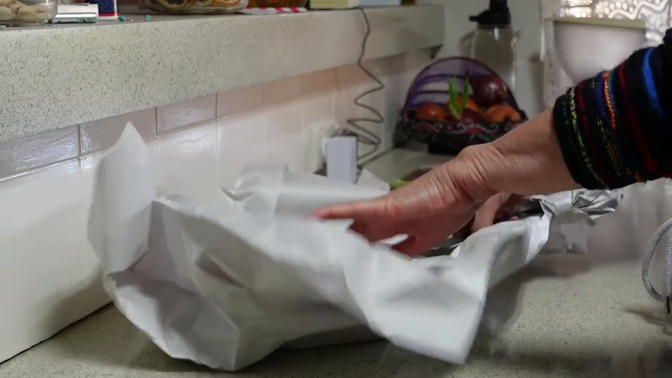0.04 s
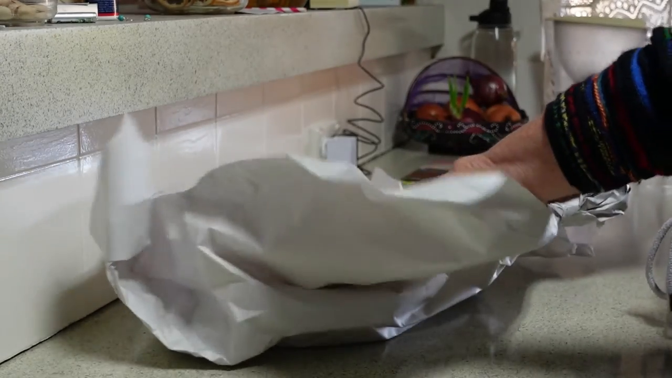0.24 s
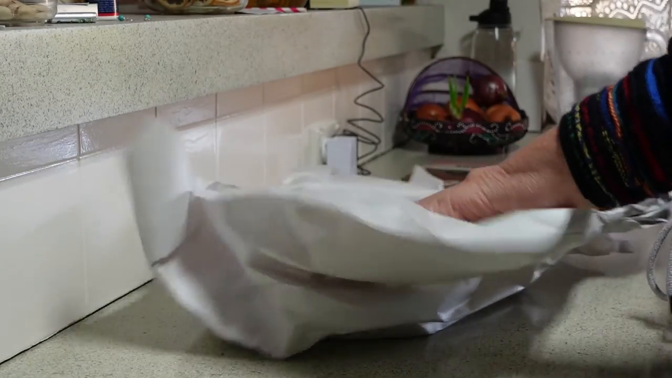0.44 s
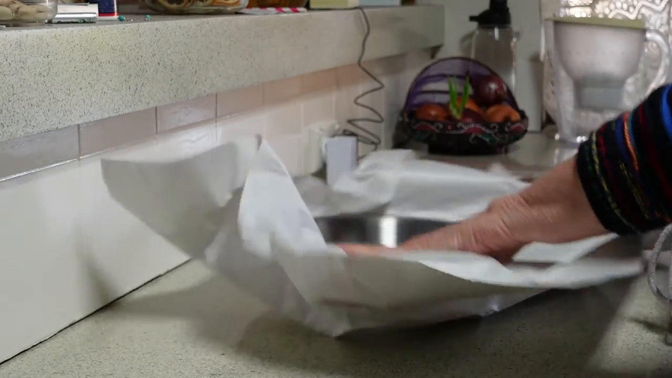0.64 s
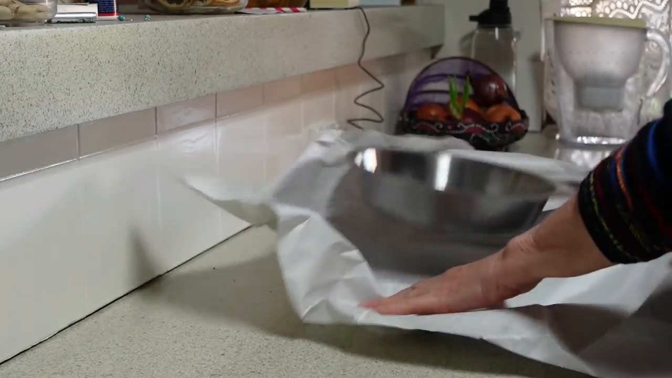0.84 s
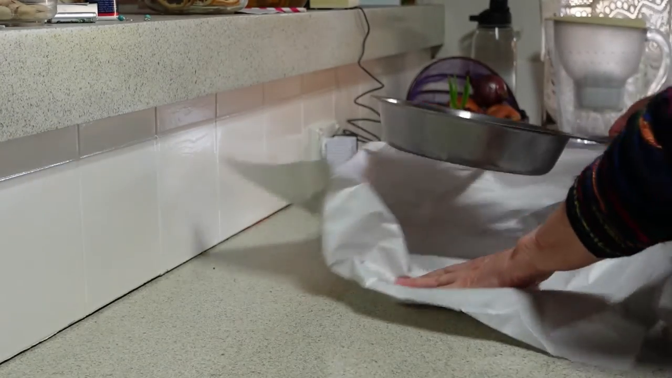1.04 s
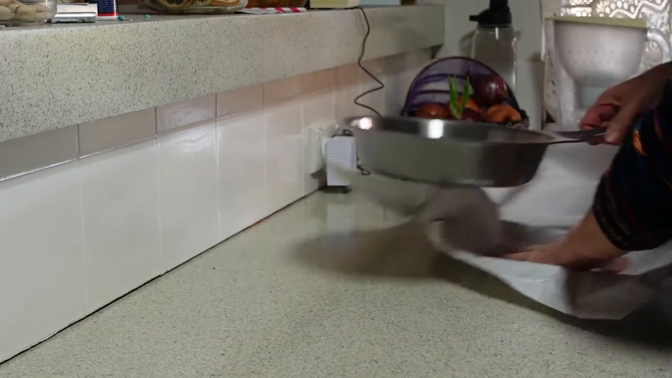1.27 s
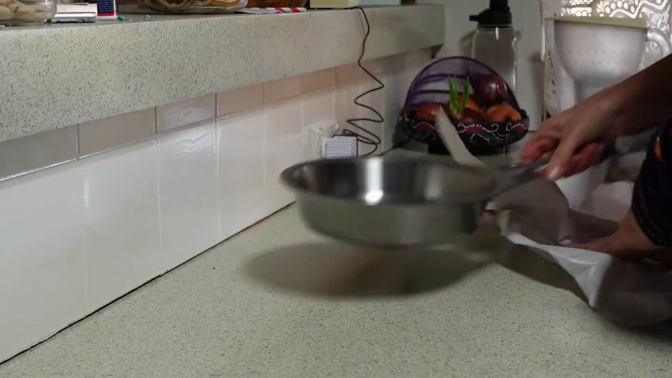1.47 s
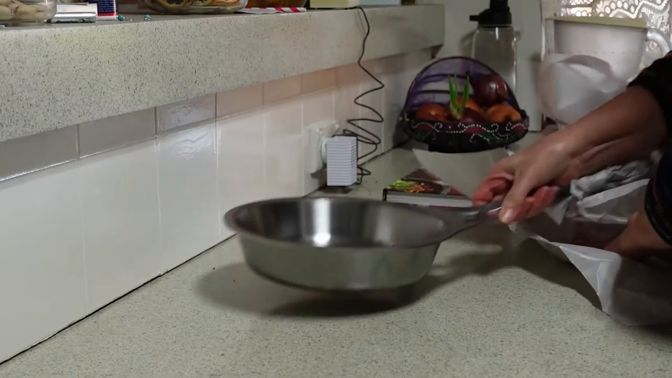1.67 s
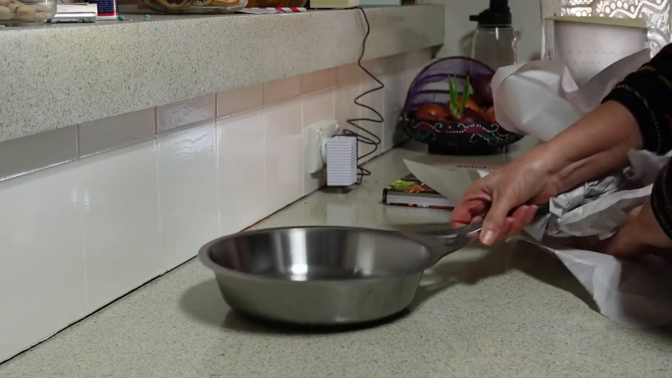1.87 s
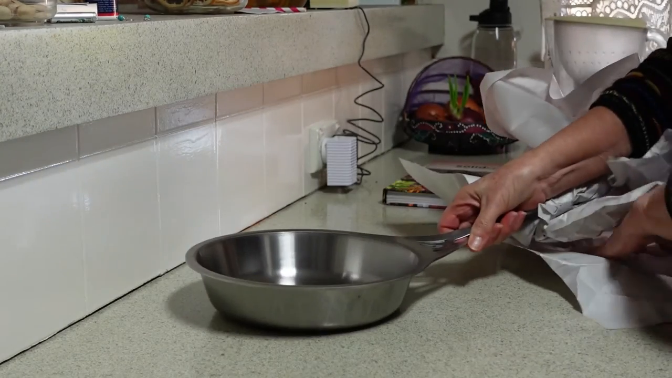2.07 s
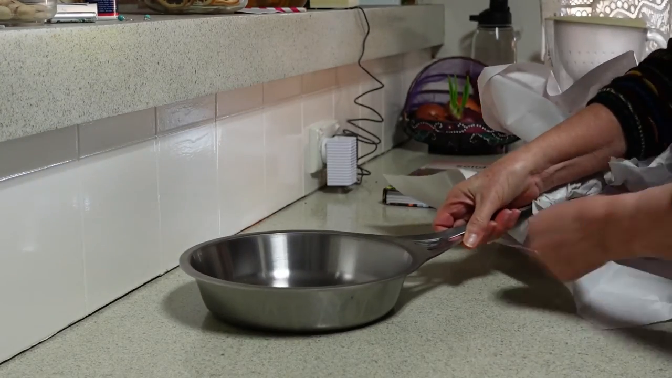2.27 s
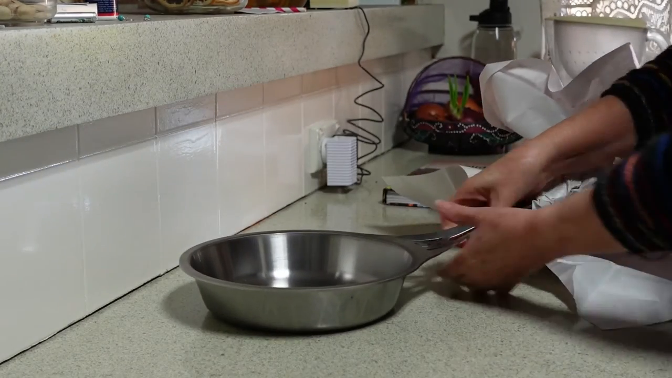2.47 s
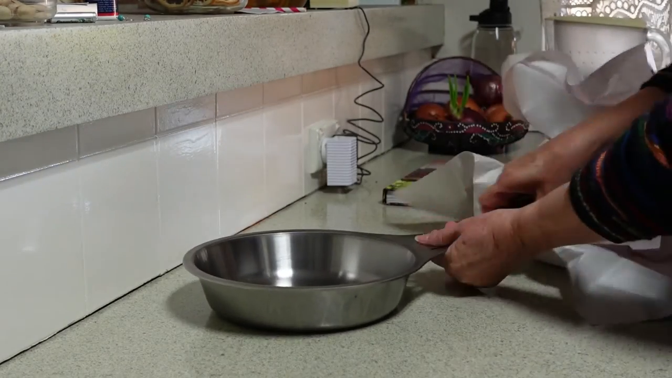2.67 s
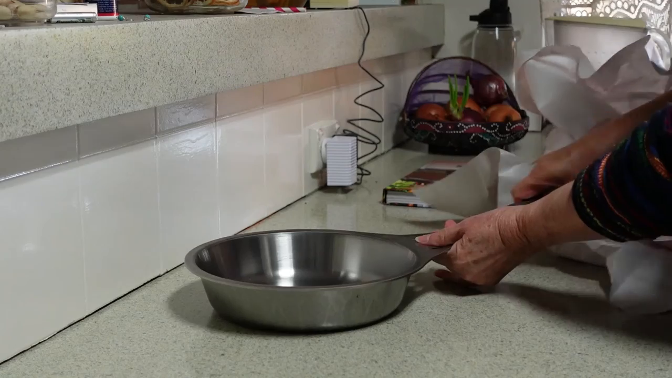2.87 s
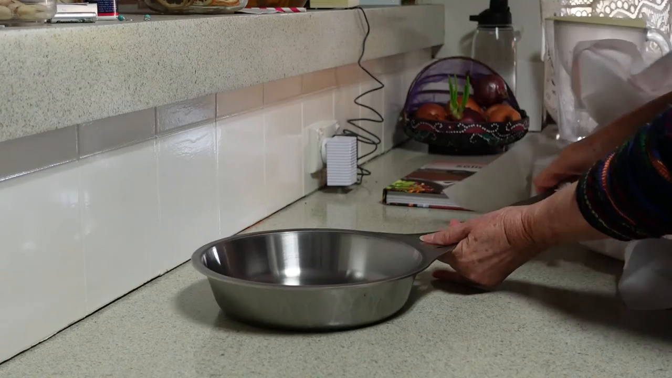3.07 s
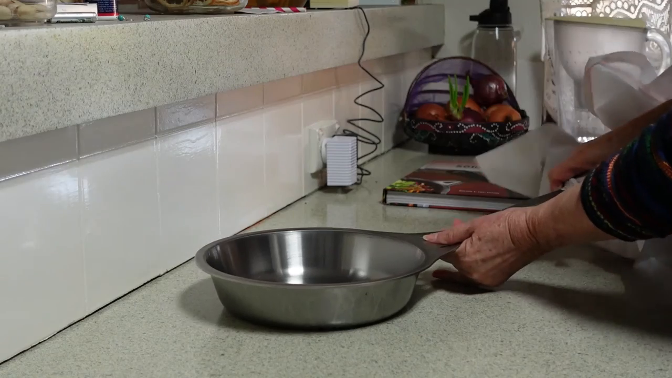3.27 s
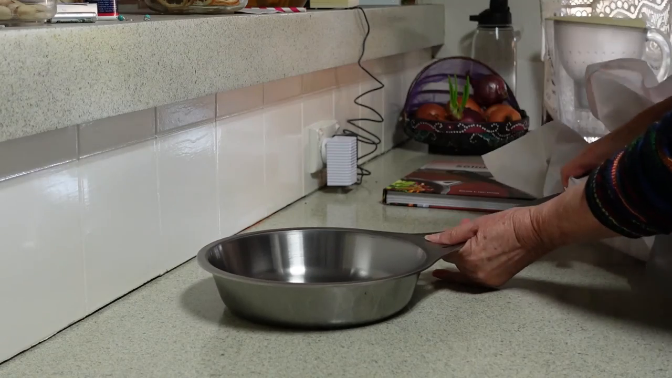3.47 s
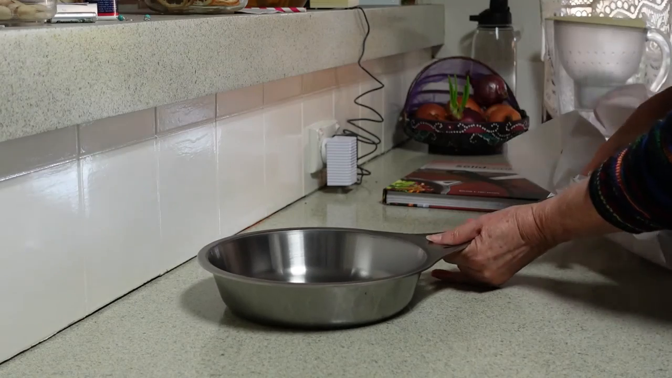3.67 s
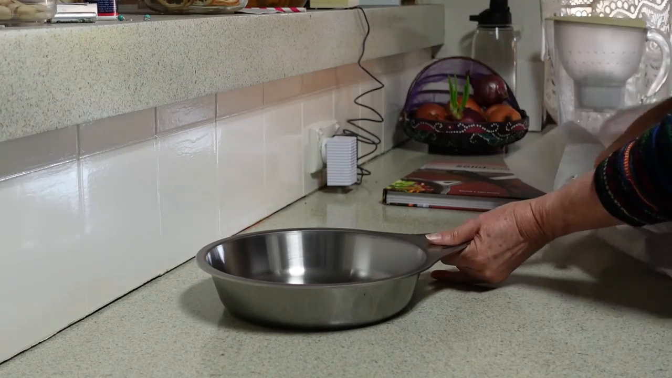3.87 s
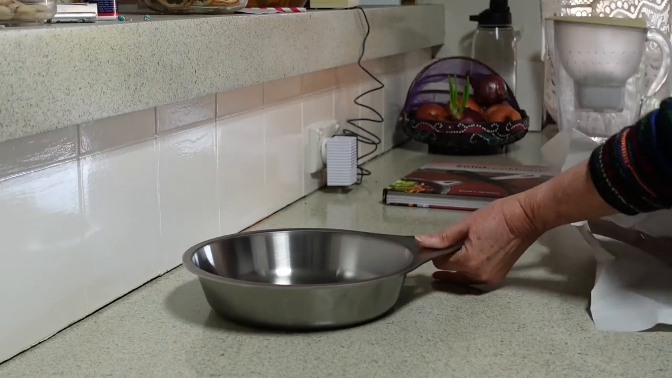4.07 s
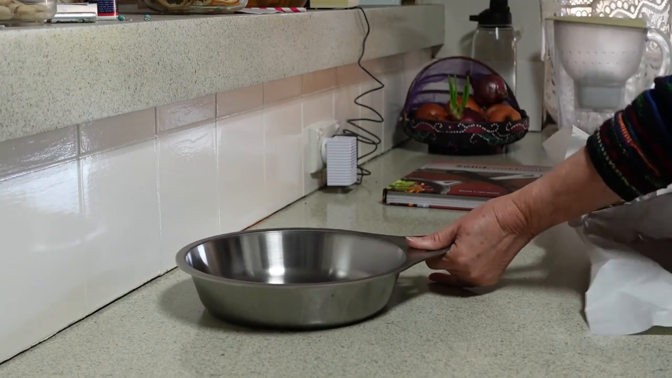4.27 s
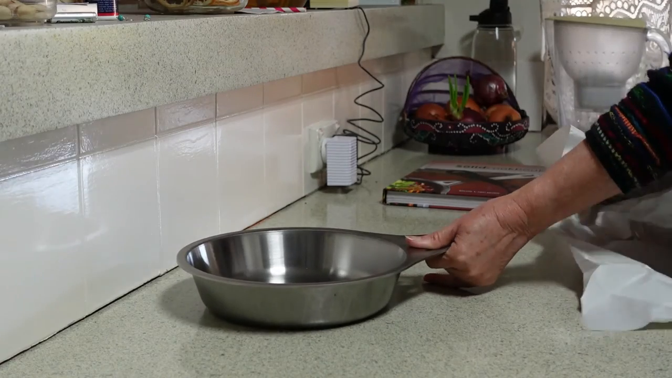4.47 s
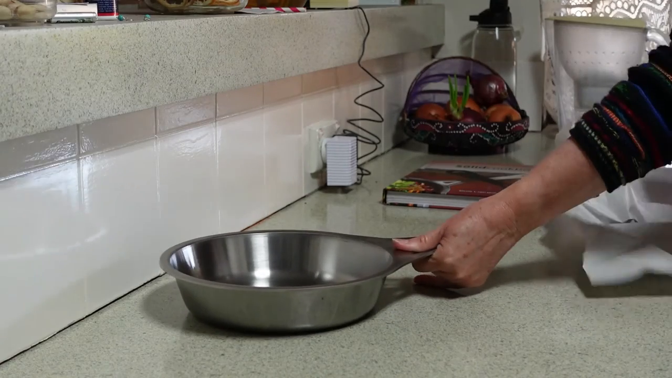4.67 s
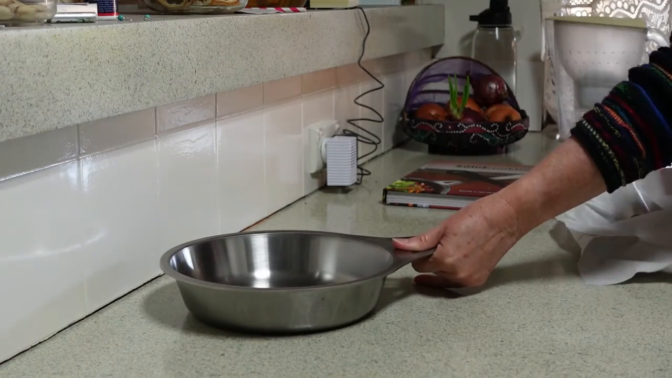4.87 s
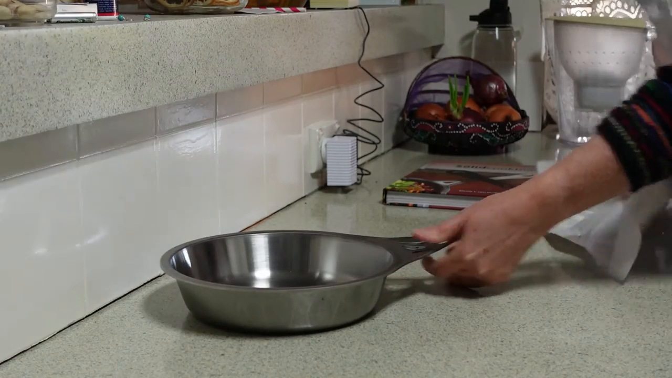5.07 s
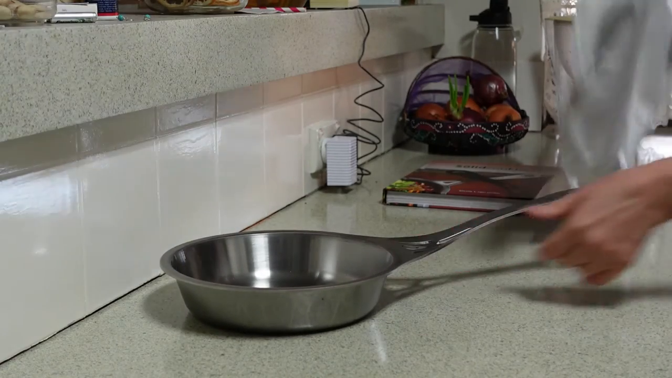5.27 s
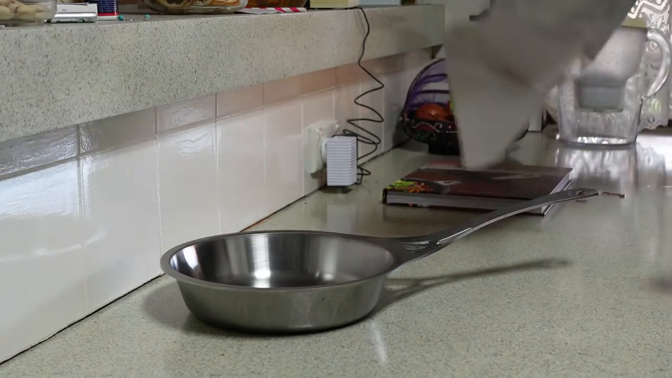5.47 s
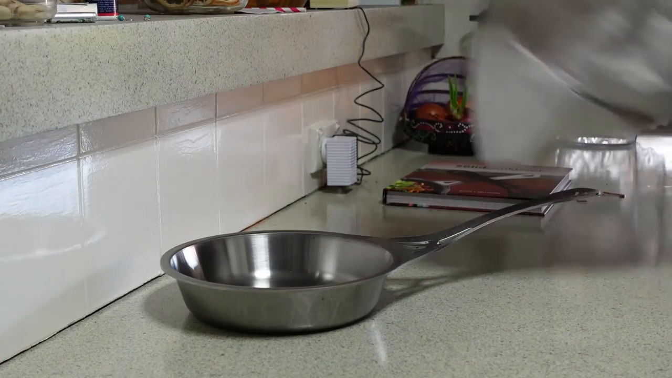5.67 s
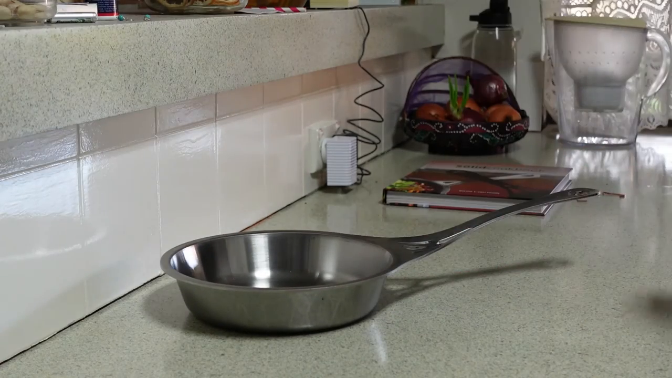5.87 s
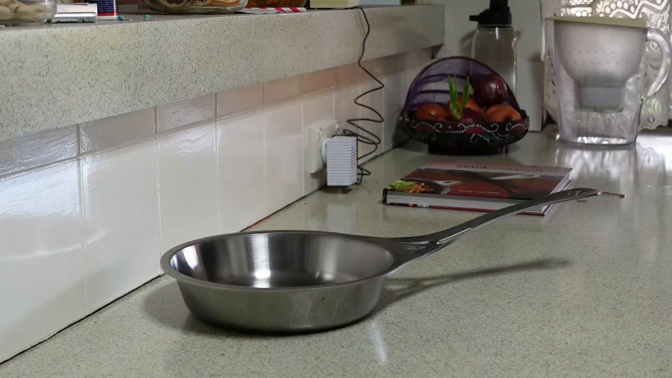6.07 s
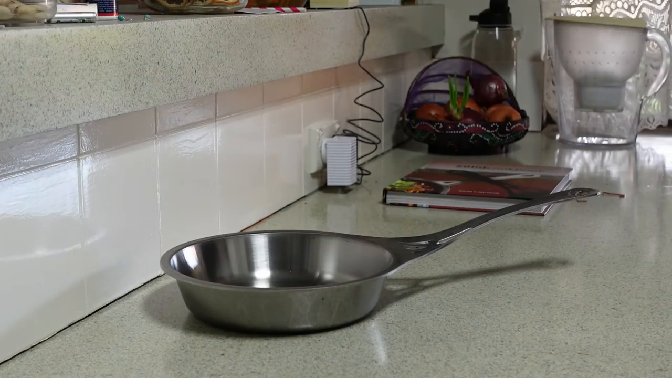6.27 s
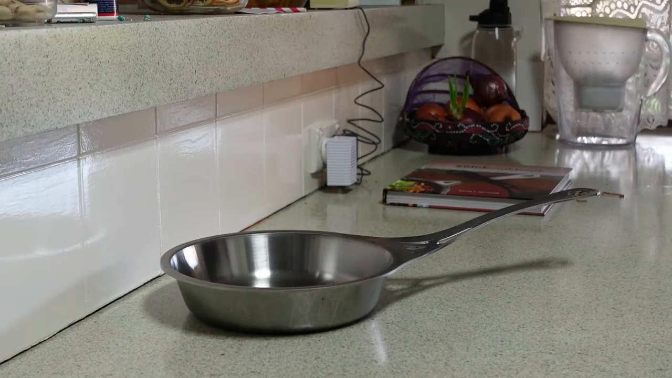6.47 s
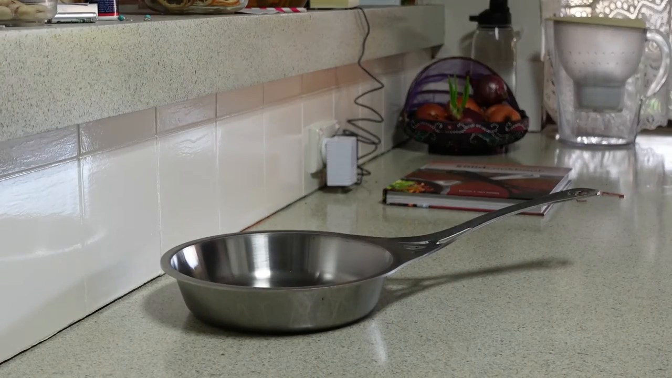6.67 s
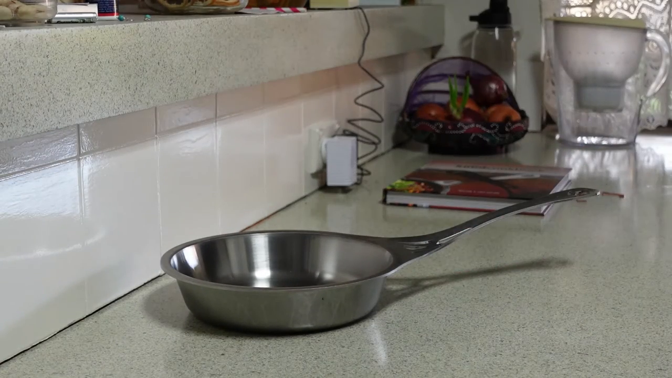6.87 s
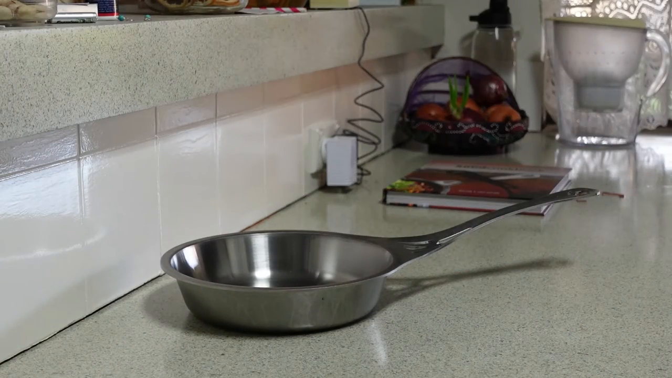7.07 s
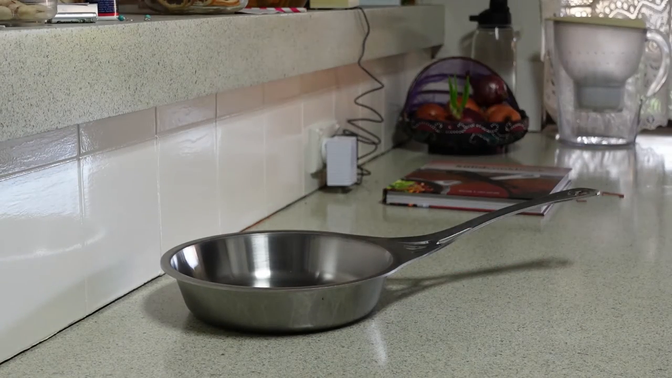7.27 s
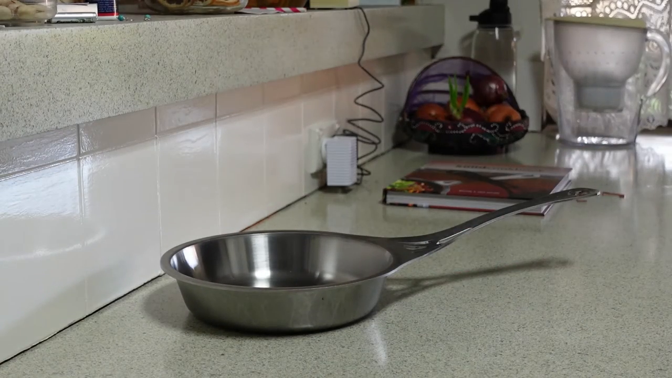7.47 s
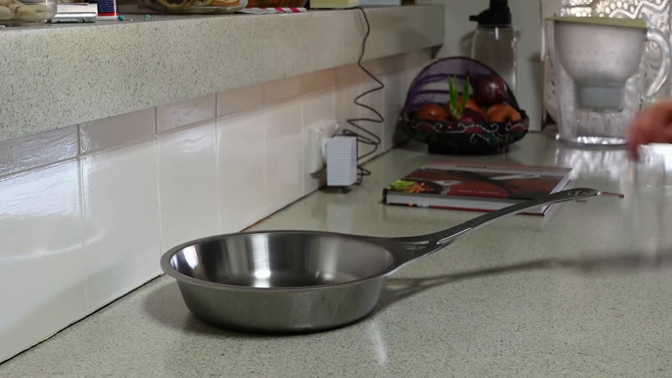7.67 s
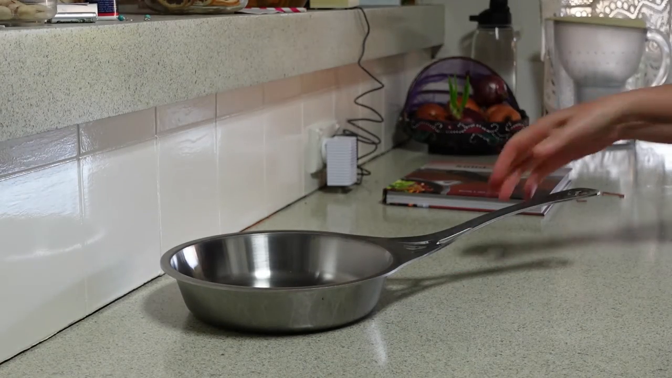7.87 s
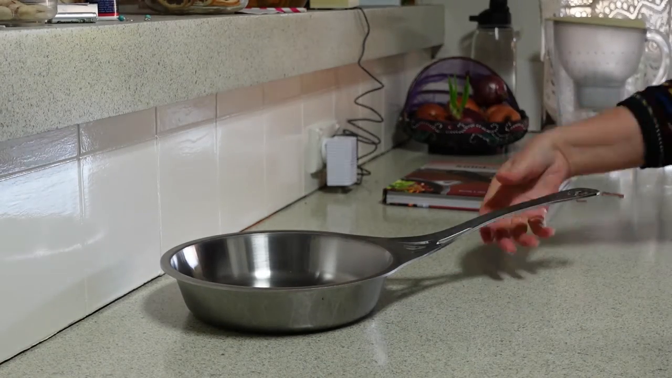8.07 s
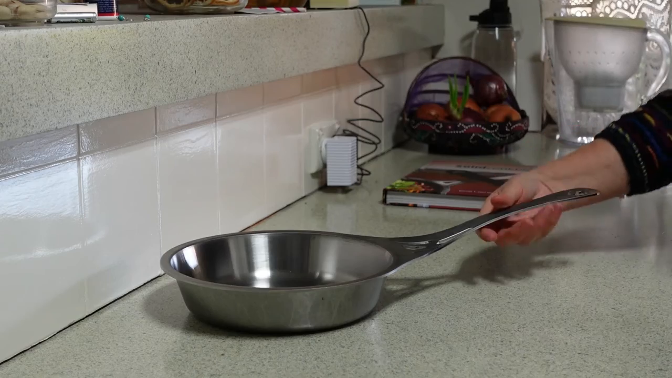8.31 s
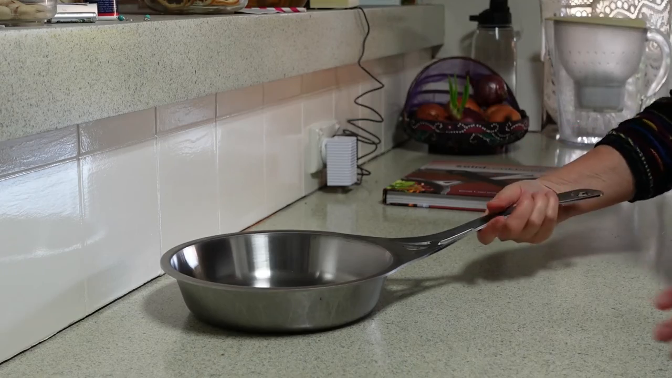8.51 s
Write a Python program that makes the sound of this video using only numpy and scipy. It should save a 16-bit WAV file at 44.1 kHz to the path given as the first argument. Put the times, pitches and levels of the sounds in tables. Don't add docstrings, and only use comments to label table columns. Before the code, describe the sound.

A small reflective kitchen heard from close by, with a faint steady appliance hum. From the start, thick stiff paper crackles in clumped bursts, with crisp snaps growing dense and loud around 0.6 to 0.75 seconds, and again from 1.1 to 1.5 as a pan is lifted out. Soft hand bumps sit underneath. At about 2.0 the pan meets the counter: a light tick, a dull short knock, a small bounce at 2.1 and faint rocking. From 2.2 to 4.2 the paper rustles more quietly in uneven drags and tugs, with a stronger pull near 4.6. After a sparser stretch, it is balled up in a loud, continuous crunch from 5.8 to 6.7, then fades with more room echo. At 7.56 the bundle lands out of sight with a soft, papery slap. Only slight settling, faint ticks and hum remain until 8.5.

```python
import sys
import numpy as np
from scipy import signal
from scipy.fft import rfft, irfft, next_fast_len
from scipy.io import wavfile
from scipy.ndimage import uniform_filter1d

SR = 44100
rng = np.random.default_rng(int(sys.argv[2]) if len(sys.argv) > 2 else 0)


def convert_level_to_amplitude(level_db):
    exponent = np.asarray(level_db, float) / 20
    return 10 ** exponent


def to_wav(s):
    ch = np.atleast_2d(s).T
    pcm = np.round(np.clip(ch, -1, 1) * 32767)
    wavfile.write(sys.argv[1], SR, pcm.astype(np.int16))


N = 376613

# (time [s], left over right [dB], share of the kitchen [dB])
PAPER_PLACE = [
    (0, -0.3, -9),
    (2, -0.5, -4.5),
    (4, -0.8, -5),
    (5.4, -0.4, -3.5),
    (6, -1.6, -2),
    (7, -3, -1.5),
    (8.54, -3.5, -0.5),
]
# (start [s], hold [s], effort [dB], fine fizz [dB])
TUGS = [(-.01, 0.0099, -22.5, 14), (0.108, 0.044, -28.5, -7), (0.25, 0.0088, -25, -7),
        (0.366, 0.0086, -30.5, 2), (0.594, 0.14, -25, -1), (0.918, 0.1, -33.5, 17),
        (1.127, 0.087, -24.5, 0), (1.204, 0.069, -23.5, -1), (1.419, 0.043, -27, -1),
        (1.753, 0.02, -26, -2), (2.385, 0.004, -43, -19), (3.43, 0.017, -40, 11), (3.608, 0.12, -29.5, 5.5),
        (3.795, 0.012, -34, -6), (3.94, 0.1, -29.5, 4), (4.182, 0.016, -35.5, 0),
        (4.324, 0.056, -33.5, -63), (4.583, 0.093, -23, -7), (4.998, 0.0055, -38, -15),
        (5.057, 0.02, -31.5, 3), (5.235, 0.041, -31.5, 1), (5.34, 0.082, -33.5, 5),
        (5.544, 0.017, -31.5, -20), (5.584, .01, -29, -16), (5.773, 0.025, -32, -3),
        (5.792, 0.06, -22.5, -1), (6.559, 0.12, -23, 0.5), (6.956, .004, -38, -12),
        (7.483, .004, -37.5, -1), (8.199, 0.039, -41, -6), (8.383, 0.038, -43.5, -23),
        (8.489, 0.057, -39, -6)]
# (start [s], length [s], effort [dB],
# sheet boom [dB], fine fizz [dB])
DRAGS = [(0.035, 0.1, -30, 1.5, -11), (0.135, 0.12, -39, -5, 11), (0.278, 0.058, -39, 12, 34),
         (0.417, 0.18, -33, -4.5, 7), (0.47, 0.048, -28, 4, 5), (0.728, 0.52, -29, -6.5, -4),
         (1.235, 0.21, -26, -2.5, 4), (1.457, 0.24, -25, -0.5, -1.5), (1.75, 0.31, -34, -3, -3),
         (2.008, 0.18, -38.5, 6, 19), (2.214, 0.062, -33.5, -4, 17), (2.3, 0.064, -40, -4, 1),
         (2.38, 0.3, -46.5, -3, 12), (2.59, 0.19, -33.5, -6, 3.5), (2.804, 0.09, -32.5, -7, 1),
         (2.94, 0.39, -33, -3.5, 1.5), (3.172, 0.14, -35.5, 7.5, 3), (3.451, 0.12, -32, -0.5, 9.5),
         (3.823, 0.13, -29, 2, 2), (4.085, 0.235, -38, 1.5, -4), (4.332, 0.29, -29, 0.5, 9),
         (4.72, 0.11, -39.5, 8, 12), (4.86, 0.17, -50.5, 1, 8), (5.102, 0.27, -35, -6.5, 3),
              (5.62, 0.15, -41, 1, 1), (5.893, 0.08, -19.5, -5.5, 2), (6.002, 0.16, -24.5, -3, 5),
              (6.198, 0.14, -24, -1, 3.5), (6.392, 0.29, -24.5, -4.5, -7), (6.638, 0.19, -29, -11, -10),
              (7.022, 0.18, -34, -15, -15), (7.149, 0.057, -30.5, -13, 5), (7.26, 0.14, -38.5, -12, -6),
              (7.698, 0.26, -37, -11.5, 6), (8.0, 0.16, -44, -18, 16)]
# (frequency [Hz], level [dB per Hz])
PAPER_COLOUR = [(35, -59), (60, -37), (176, -7.5), (268, -5.5), (400, -7), (800, -3.5), (1280, -4.5),
                (2140, -3), (7750, -10.5), (14900, -20)]
# (time [s], peak
# [dB], pitch [Hz], sharp edge over the peak [dB])
CREASE_SNAPS = [(0.0312, -16, 1890, -9), (0.049, -18, 2390, -9), (0.0638, -14, 4650, -7),
                (0.0696, -19, 2090, -10), (0.0952, -19, 1740, -14), (0.1126, -14, 4690, -7),
                (0.1215, -14, 3750, -9), (0.129, -11, 4460, -7), (0.1426, -15, 2000, -12),
                (0.201, -23, 5680, -2), (0.2336, -25, 1340, -8), (0.256, -14, 4050, -7),
                (0.2721, -18, 3360, -5), (0.3074, -19, 2090, -5), (0.3628, -13, 1210, -3),
                (0.3694, -12, 1270, -10), (0.3746, -17, 4110, -10), (0.4242, -22, 3140, -8),
                (0.4306, -21, 2090, -8), (0.4479, -17, 4240, -5), (0.4583, -16, 2560, -7),
                (0.4706, -12, 2000, -11), (0.5164, -13, 7390, -3), (0.5818, -17, 1660, -9),
                (0.5967, -12, 4970, -5), (0.6032, -13, 3270, -10), (0.6129, -13, 1590, -3),
                (0.6175, -17, 4440, -6), (0.6261, -15, 3640, -4), (0.631, -16, 4460, -5),
                (0.6426, -15, 1610, -5), (0.6506, -6, 1590, -7), (0.6596, -11, 3790, -9),
                (0.6716, -4, 3340, -5), (0.6765, -8, 3120, -4), (0.6907, -8, 1420, -6),
                (0.7041, -11, 3980, -4), (0.712, -10, 3790, -7), (0.7199, -9, 1700, -7),
                (0.7347, -12, 2150, -8), (0.7801, -15, 1270, -15), (0.804, -18, 3620, -8),
                (0.8236, -18, 8980, -1), (0.8285, -18, 4240, -3), (0.8331, -19, 6220, -1),
                (0.862, -19, 2760, -4), (0.88, -15, 7360, -3), (0.8888, -18, 6700, -2),
                (0.9238, -11, 3750, -4), (0.9292, -17, 3120, -5), (0.951, -16, 2170, -10),
              (0.9594, -15, 2090, -8), (0.9873, -18, 2480, -6), (0.9947, -14, 8200, -1),
              (1.0602, -19, 3830, -7), (1.0904, -19, 3600, -8), (1.1227, -18, 2500, -8),
              (1.1367, -12, 3510, -6), (1.1491, -8, 2860, -8), (1.1604, -13, 2520, -8),
              (1.1881, -13, 3290, -3), (1.2, -8, 2500, -7), (1.2468, -11, 2300, -12),
              (1.2712, -8, 7130, -3), (1.2803, -11, 4800, -4), (1.312, -14, 1510, -6),
              (1.4003, -17, 1290, -6), (1.4079, -16, 4240, -6), (1.4352, -10, 5060, -2),
              (1.4452, -11, 5470, -3), (1.4765, -13, 6160, -2), (1.4847, -12, 3940, -8),
              (1.5643, -13, 2560, -5), (1.5766, -16, 2280, -9), (1.6081, -15, 7640, -2),
              (1.6572, -19, 3700, -7), (1.6983, -18, 2560, -8), (1.7283, -20, 1940, -6),
              (1.7571, -16, 8100, -3), (1.7669, -13, 2370, -10), (1.8398, -23, 2200, -8),
              (1.8786, -18, 4500, -8), (1.8857, -22, 2520, -3), (1.9443, -24, 1180, -12),
                (2.0767, -17, 6520, -5), (2.0816, -16, 4290, -8), (2.0988, -14, 2200, -20),
                (2.1777, -21, 3400, -7), (2.1863, -21, 3360, -5), (2.2042, -15, 4390, -6),
                (2.2858, -21, 2370, -4), (2.3662, -27, 2330, -4), (2.3809, -25, 1340, -14),
                (2.3862, -13, 1790, -9), (2.3923, -24, 1790, -12), (2.5754, -25, 3570, -6),
                (2.5821, -24, 5750, -4), (2.5877, -23, 1310, -7), (2.6707, -14, 4390, -3),
                (2.7059, -22, 5810, -4), (2.7323, -22, 2820, -5), (2.8181, -23, 5770, -2),
                (2.8272, -23, 8030, -2), (2.878, -20, 1270, -11), (2.9053, -22, 5360, -2),
                (2.9528, -24, 5230, -5), (2.97, -21, 1120, -7), (2.9995, -18, 2240, -6),
                (3.0088, -15, 5490, -1), (3.0441, -22, 3620, -4), (3.1506, -21, 5620, -2),
                (3.228, -19, 4540, -5), (3.237, -19, 4840, -4), (3.2846, -21, 3360, -6),
                (3.334, -19, 6550, 0), (3.3387, -21, 8140, -2), (3.4023, -30, 8980, -1),
                (3.4668, -21, 3360, -5), (3.475, -20, 3620, -5), (3.4974, -20, 2220, -6),
                (3.5602, -20, 1140, -11), (3.6123, -17, 1360, -10), (3.6268, -15, 4110, -7),
                (3.6548, -14, 2840, -6), (3.6667, -15, 3140, -9), (3.7258, -19, 2410, -10),
                (3.8057, -21, 3900, -6), (3.851, -21, 4350, -10), (3.9393, -17, 1770, -6),
                (3.9632, -12, 6550, -2), (4.0116, -19, 2760, -8), (4.023, -17, 6050, -1),
                (4.1835, -21, 5560, -1), (4.1895, -21, 2220, -4), (4.3188, -14, 4110, -6),
              (4.3233, -15, 4130, -9), (4.328, -15, 4440, -7), (4.3531, -20, 1720, -10),
              (4.3614, -18, 1830, -8), (4.3661, -19, 2390, -11), (4.4983, -17, 2690, -5),
              (4.5314, -16, 5150, -1), (4.5777, -19, 3660, -4), (4.5838, -16, 4030, -6),
              (4.59, -11, 1610, -5), (4.6326, -13, 3060, -8), (4.6682, -13, 3380, -7),
              (4.6726, -13, 1850, -9), (4.6934, -17, 2410, -9), (4.7563, -24, 4370, -7),
              (5.0054, -30, 2970, -13), (5.0617, -22, 4970, -2), (5.0706, -22, 5600, -1),
              (5.1, -17, 4570, -4), (5.156, -20, 2970, -4), (5.2292, -20, 6630, -2),
              (5.2399, -19, 7430, -3), (5.2552, -13, 5940, -1), (5.3518, -15, 6960, -1),
              (5.3828, -14, 2260, -12), (5.3912, -21, 3320, -8), (5.4524, -25, 4180, -6),
              (5.5151, -24, 3980, -10), (5.5497, -19, 5810, -2), (5.5559, -25, 2200, -7),
              (5.5705, -20, 2070, -8), (5.592, -13, 5080, -3), (5.5969, -20, 3250, -5),
                (5.7432, -30, 3550, -14), (5.7733, -24, 3040, -11), (5.8003, -14, 5150, -3),
              (5.8053, -11, 5150, -5), (5.8263, -10, 2410, -4), (5.8754, -12, 2050, -6),
              (5.8966, -14, 1610, -6), (5.9016, -7, 6090, -1), (5.9205, -10, 3880, -7),
              (5.9272, -11, 2130, -9), (5.954, -7, 5250, -2), (5.962, -9, 7690, -3), (6.0117, -9, 3900, -4),
              (6.0163, -13, 8330, -1), (6.0531, -9, 5300, -2), (6.0758, -13, 5280, -3),
              (6.1326, -7, 3210, -2), (6.142, -12, 5170, -4), (6.1884, -13, 4800, -4),
              (6.1939, -14, 2020, -7), (6.212, -11, 3750, -6), (6.2174, -12, 8460, -2),
              (6.2707, -7, 2150, -10), (6.2807, -13, 4070, -4), (6.3111, -12, 2150, -7),
              (6.3504, -16, 4520, -7), (6.3776, -15, 2430, -7), (6.4738, -16, 8960, -2),
              (6.5082, -16, 2170, -10), (6.5331, -16, 3510, -14), (6.5572, -11, 4890, -3),
              (6.5808, -10, 2580, -3), (6.6191, -10, 3530, -4), (6.6482, -13, 6570, -5),
              (6.7442, -16, 3290, -4), (6.7909, -16, 4370, -5), (6.8128, -21, 3570, -10),
              (6.8253, -17, 6700, -3),
                (6.9252, -32, 1290, -14), (6.9562, -26, 5900, -4), (6.9649, -21, 3750, -12),
                  (7.0783, -22, 7150, -2), (7.1418, -24, 2410, -6), (7.1567, -21, 7920, -1),
                  (7.4842, -30, 2890, -9), (7.5586, -10, 1740, -16), (7.6048, -14, 1550, -9),
                  (7.6724, -21, 1960, -10), (8.2119, -30, 3600, -8), (8.3843, -36, 1640, -12)]
# (frequency [Hz], level [dB per Hz])
HUM_COLOUR = [(18, -52), (40, -19), (85, -16.5), (124, 4), (190, -5), (520, -12.5), (1000, -20),
              (3000, -13), (8000, -22.5), (16000, -31)]
# (time [s], level [dB], frequency [Hz])
BUMPS = [
    (0.52, -44, 99),
    (1.428, -36, 184),
    (1.52, -36, 182),
    (1.618, -42, 193),
    (1.719, -41, 180),
    (2.0, -55, 61),
    (4.81, -45, 125),
    (5.219, -62, 60),
    (8.487, -50, 418),
]
# (time [s], blow [dB], tick over the blow [dB], tick pitch [Hz], tick length [cycles])
PAN_KNOCKS = [
    (1.9892, -17, 21.5, 1510, 0.95),
    (2.016, -13.5, -5, 199, 2),
    (2.1, -22, 22.5, 734, 0.43),
    (2.238, -31, -2, 210, 2.9),
    (2.349, -36.5, 14, 361, 5.5),
]
# (frequency [Hz], level [dB], t60 [s])
COUNTER_MODES = [(148, 1, 0.2), (188, -4.5, 0.22), (250, -2, 0.1), (306, -4, 0.063), (347, -8.5, 0.33),
                 (405, -7, .15), (468, -6, 0.086), (514.5, -5, 0.31), (583.4, 0.5, 0.22), (718, 5, 0.099),
                 (900, 1, 0.11), (1310, 1, .1), (1470, 0, .1), (1830, -5, .1)]
# (time [s], level [dB])
LANDING = (7.558, -18)
# (frequency [Hz], level [dB per Hz])
BUNDLE_COLOUR = [(60, -54), (150, -12.5), (400, -1.5), (690, -9), (830, -13), (1150, -1), (1900, -4),
                 (2600, -5.5), (6000, -7), (16000, -21)]
# (frequency [Hz], sharpness [Q], level [dB])
AIR_POCKETS = [(660, 4.5, -6), (1140, 4, -7), (1900, 4, -9)]
# (frequency [Hz], t60 [s])
KITCHEN_T60 = [(150, 0.83), (600, 0.63), (2000, 0.53), (6000, 0.39), (14000, 0.31)]
# (frequency [Hz], level under their sum [dB])
MICROPHONE_WIDTH = [(60, -16), (130, -20), (300, -21), (700, -13.5), (1500, -15.5), (4000, -13),
                    (9000, -14.5), (15000, -24)]


def evened(x):
    return x / np.sqrt(np.mean(x ** 2) + 1e-20)


def read(points, hz):
    f, value = np.transpose(points)
    return np.interp(np.log(hz + 1), np.log(f + 1), value)


def coloured(x, points):
    size = next_fast_len(x.shape[-1])
    gain = convert_level_to_amplitude(read(points, np.fft.rfftfreq(size, 1 / SR)))
    return irfft(rfft(x, size) * gain, size)[..., :x.shape[-1]]


def add(mix, s, sound):
    part = mix[round(s * SR):][:len(sound)]
    part += sound[:len(part)]


def band(x, hz, q):
    return signal.lfilter(*signal.iirpeak(np.clip(hz, 50, SR / 2.2), max(q, .3), SR), x)


def band_twice(x, hz, q):
    return band(band(x, hz, q), hz, q)


def dying(kicks, decay_s):
    return signal.lfilter([1], [1, -np.exp(-1 / (decay_s * SR))], kicks)


def handling():
    t = np.arange(0, N + 64, 64) / SR
    start, hold, db, tug_fizz = np.transpose(TUGS)[:, :, None]
    tug_rise_s, tug_fall_db_per_s = 0.0025, 216
    falling_db = tug_fall_db_per_s * np.maximum(t - start - hold, 0)
    tugs = convert_level_to_amplitude(db - falling_db) * np.clip((t - start) / tug_rise_s, 0, 1)

    start, length, db, drag_boom, drag_fizz = np.array(DRAGS).T[:, :, None]
    drag_rise_db_per_s, drag_fall_db_per_s = 400, 200
    rising_db = drag_rise_db_per_s * np.maximum(start - t, 0)
    falling_db = drag_fall_db_per_s * np.maximum(t - start - length, 0)
    drags = convert_level_to_amplitude(db - rising_db - falling_db)

    power = np.vstack([tugs, drags]) ** 2
    total = power.sum(0) + convert_level_to_amplitude(2 * -66)
    boom_db = (power * np.vstack([0 * tug_fizz, drag_boom])).sum(0) / total
    fizz_db = (power * np.vstack([tug_fizz, drag_fizz])).sum(0) / total
    return (np.interp(np.arange(N) / SR, t, c) for c in (10 * np.log10(total), boom_db, fizz_db))


def rustle(per_s=300, spread_db=1.0, cycles=1.7, clump_s=0.0069, slide=1.84, flick_s=0.0021, patchy_db=3.0):
    effort_db, boom_db, fizz_db = handling()
    clump_db = 1.3 * evened(dying(rng.random(N) < 150 / SR, clump_s))
    out = np.zeros(N)
    moments = rng.random((4, N))
    for hz, dice in zip(np.geomspace(160, 15000, num=24), np.repeat(moments, 6, axis=0)):
        sliding = rng.standard_normal(N)
        chance = per_s * np.sqrt(hz / 3000) / SR
        size_db = -spread_db * np.log(np.clip(dice / chance, .07, 1))
        flicks = dying((dice < chance) * convert_level_to_amplitude(size_db), flick_s)
        patches = evened(uniform_filter1d(rng.standard_normal(N // 256 + 1), size=9)).repeat(256)[:N]
        drive = (evened(flicks) + slide) * sliding * convert_level_to_amplitude(patchy_db * patches)
        octaves = np.log2(hz / 3000)
        tilt_db = np.clip(-octaves / 3.6, 0, 1) * boom_db + np.clip(octaves / 3.5, 0, 1) * fizz_db
        level = convert_level_to_amplitude(read(PAPER_COLOUR, hz) + tilt_db) * np.sqrt(hz)
        out += level * evened(band_twice(drive, hz, cycles))
    return convert_level_to_amplitude(effort_db + clump_db) * evened(out)


def hum():
    return convert_level_to_amplitude(-50) * evened(coloured(rng.standard_normal(N), HUM_COLOUR))


def snaps(rise_s=.0002, crack_s=0.0009, shiver_s=0.012, shiver_db=-17, pure=.5, q=1.7, boom_db=-24, level_db=-0.8):
    out, u = np.zeros(N), np.arange(2000) / SR
    creases = np.array(CREASE_SNAPS)
    packet = (1 - np.exp(-u / rise_s)) * np.exp(-u / crack_s)
    packet = packet / packet.max()
    shiver = convert_level_to_amplitude(shiver_db) * (1 - np.exp(-u / 0.0006)) * np.exp(-u / shiver_s)
    body_hz = 1800
    noises = rng.standard_normal((len(creases), 3, len(u)))
    for (s, db, hz, edge_db), (a, b, c) in zip(creases, noises):
        rough = evened(band(a, np.sqrt(hz * body_hz), q))
        fizz = evened(band(b, 5470, 1.0))
        tone = pure * np.sin(2 * np.pi * hz * u) + (1 - pure) * 0.64 * rough
        crack = packet ** np.clip(hz / 3000, .6, 1.2) * tone
        edge = packet ** 2.4 * fizz
        boom = band(c * np.exp(-u / 0.0066), 807, 7.8)
        crack, edge, boom = (part / abs(part).max() for part in (crack, edge, boom))
        sharp = convert_level_to_amplitude(edge_db + 2.05) * (edge + 1.78 * shiver * fizz)
        add(out, s, convert_level_to_amplitude(db + level_db) * (crack + shiver * rough + sharp + convert_level_to_amplitude(boom_db) * boom))
    return out


def kitchen(x):
    taps = np.zeros((2, SR * 3 // 4))
    at = np.arange(500, taps.shape[1] - 20, 20)
    at = at + rng.integers(0, 20, (2, len(at)))
    np.put_along_axis(taps, at, rng.choice([-1., 1.], at.shape), 1)
    hz, t, z = signal.stft(taps, SR, nperseg=256)
    decay = convert_level_to_amplitude(-60 * t / read(KITCHEN_T60, hz)[:, None])
    tails = signal.istft(z * decay, SR, nperseg=256)[1]
    turn = 2 * np.pi * 3.1 * np.arange(N) / SR
    fed = x * np.array([np.cos(turn), np.sin(turn)])
    return signal.fftconvolve(fed, tails / np.linalg.norm(tails[0]), axes=1)[:, :N].sum(0)


def bumps():
    out, u = np.zeros(N), np.arange(SR // 5) / SR
    swell = (u / 0.022) ** 2 * np.exp(2 - u / 0.011)
    for s, db, hz in BUMPS:
        add(out, s, convert_level_to_amplitude(db + 3.0) * np.sin(2 * np.pi * hz * u) * swell)
    return out


def pan_knocks():
    out, u = np.zeros(N), np.arange(SR // 2) / SR
    for s, db, tick_db, tick_hz, cycles in PAN_KNOCKS:
        hard_hz = 307 + 0.55 * tick_hz
        ring = np.zeros(len(u))
        for k, (f, mode_db, t60) in enumerate(COUNTER_MODES):
            level = convert_level_to_amplitude(mode_db - 60 * u / t60) / (1 + (f / hard_hz) ** 2)
            ring += level * np.sin(2 * np.pi * (f * u - k / 4))
        tick = np.sin(2 * np.pi * tick_hz * u * (1 - 4.4 * u)) * np.exp(-u * tick_hz / cycles)
        rattle = 3.9 * band_twice(rng.standard_normal(len(u)), hard_hz, 0.54) * np.exp(-u / 0.032)
        onset = 1 - np.exp(-u / 0.0031)
        add(out, s, convert_level_to_amplitude(db) * ((ring + rattle) * onset + convert_level_to_amplitude(tick_db) * tick))
    return out


def landing():
    out, u = np.zeros(N), np.arange(SR // 3) / SR
    puff = evened(coloured(rng.standard_normal(len(u)), BUNDLE_COLOUR)) * np.exp(-u / 0.068)
    ring = np.zeros(len(u))
    for hz, q, pocket_db in AIR_POCKETS:
        ring += convert_level_to_amplitude(pocket_db) * evened(band_twice(rng.standard_normal(len(u)), hz, q))
    ring *= np.exp(-u / 0.046)
    s, db = LANDING
    add(out, s, convert_level_to_amplitude(db) * (0.92 * puff + ring) * np.minimum(u / 0.0019, 1))
    return out


def microphones(x, pan_db, smear_s=0.046):
    smear = rng.standard_normal(8192) * np.exp(-np.arange(8192) / (smear_s * SR))
    reflections = coloured(smear / np.linalg.norm(smear), MICROPHONE_WIDTH)
    side = convert_level_to_amplitude(-2.0) * signal.oaconvolve(x, reflections)[:N]
    return np.array([x + side, x - side]) * convert_level_to_amplitude(np.array([pan_db, -pan_db]) / 2)


def scene():
    s, pan_db, wet_db = np.transpose(PAPER_PLACE)
    pan_db, wet_db = (np.interp(np.arange(N) / SR, s, c) for c in (pan_db, wet_db))
    paper, cracks, knocks = rustle() + landing(), snaps(), pan_knocks()
    wet = kitchen(convert_level_to_amplitude(wet_db) * (paper + cracks) + convert_level_to_amplitude(-6.5) * knocks)
    near = paper / np.sqrt(1 + convert_level_to_amplitude(2 * wet_db)) + cracks + knocks + wet / 2.02
    near = signal.sosfilt(signal.butter(3, 80, "high", fs=SR, output="sos"), near)
    return microphones(near + hum() + bumps(), pan_db)


def low_pass(x):
    return signal.sosfilt(signal.butter(12, 17020, fs=SR, output="sos"), x)


def record(dry):
    squeezed = 1.187 * np.tanh(dry / 1.417)
    edge = signal.firwin(2047, 15870, window=("kaiser", 8), fs=SR)
    mix = signal.oaconvolve(squeezed, edge[None], "same")
    return low_pass(mix)


dry = scene()
out = record(dry)
to_wav(out)
```